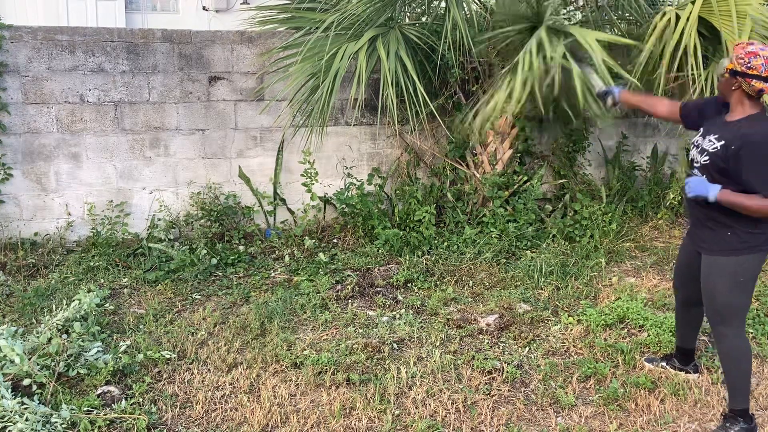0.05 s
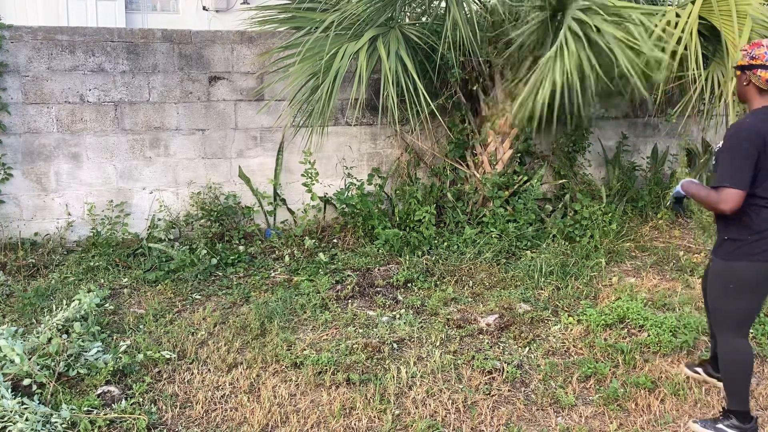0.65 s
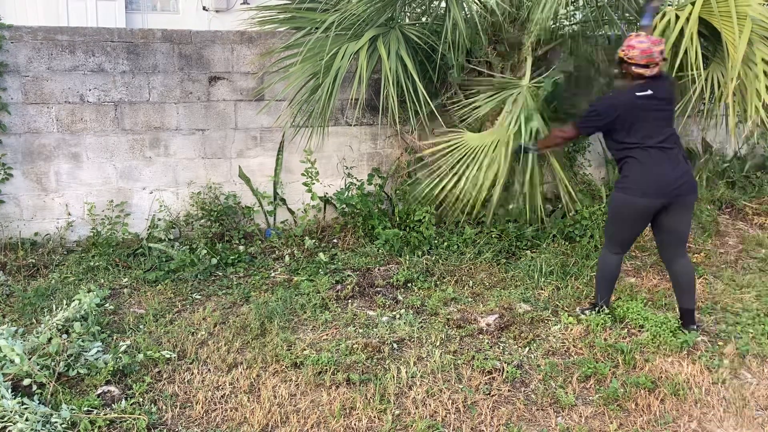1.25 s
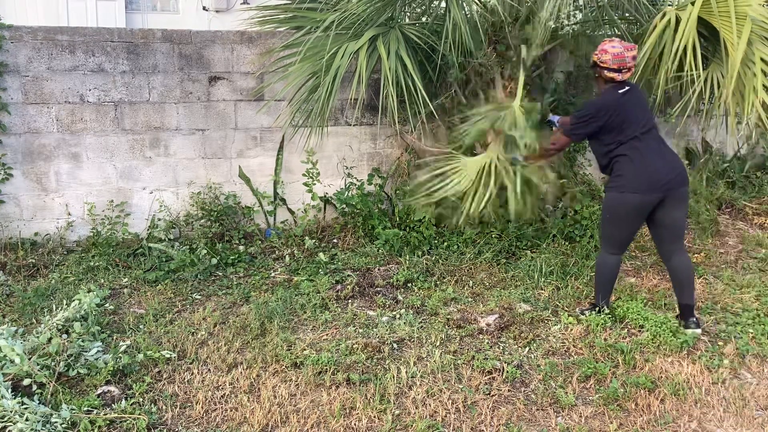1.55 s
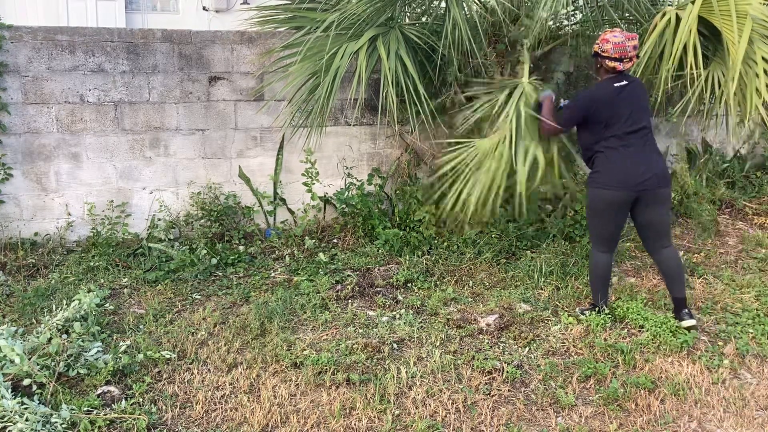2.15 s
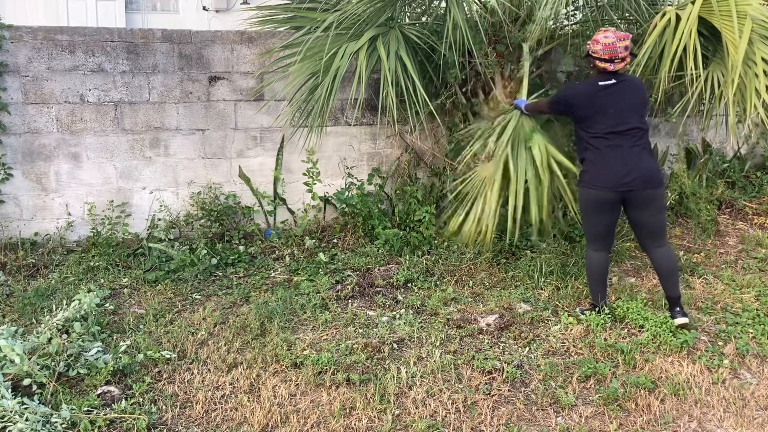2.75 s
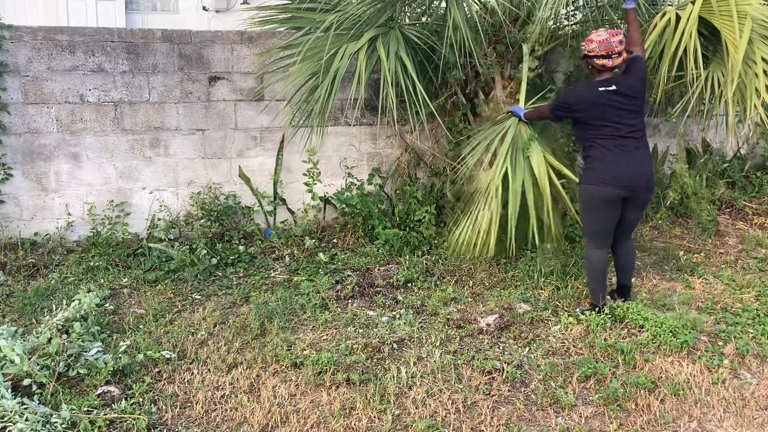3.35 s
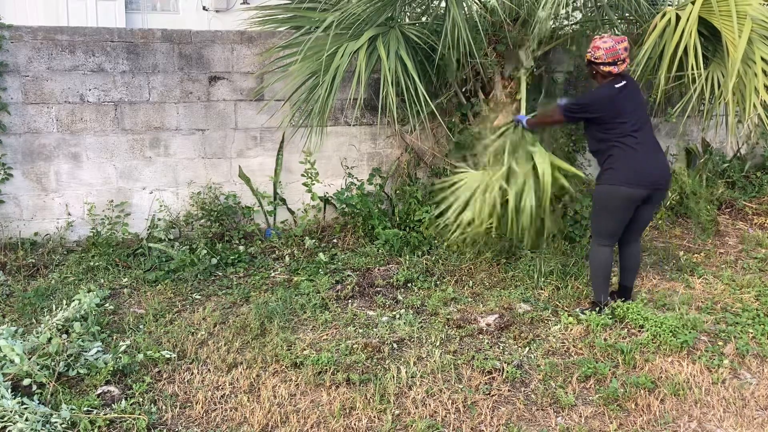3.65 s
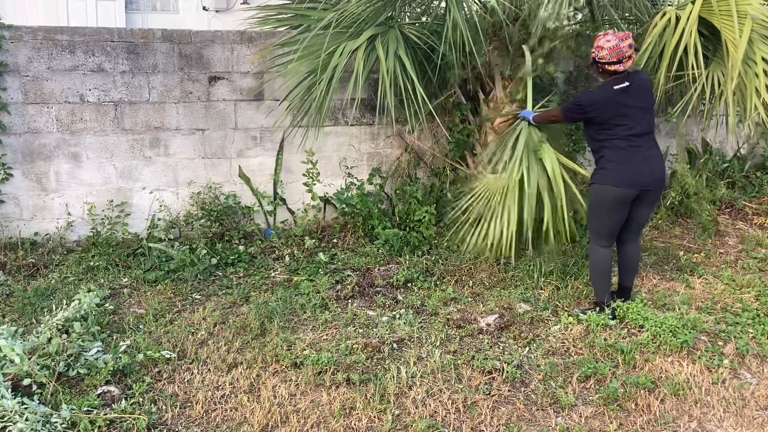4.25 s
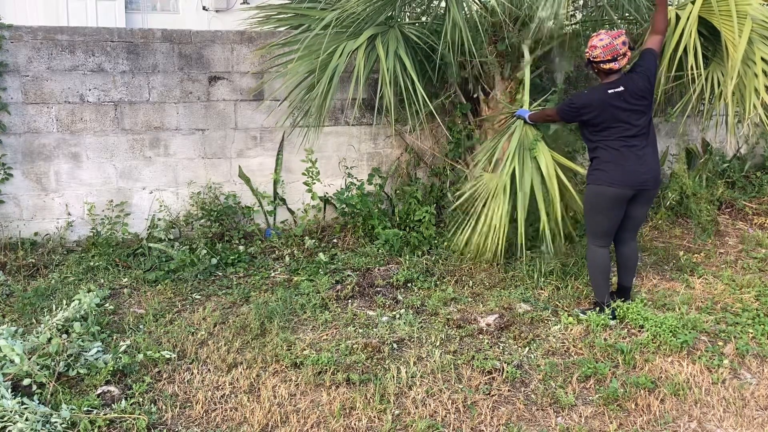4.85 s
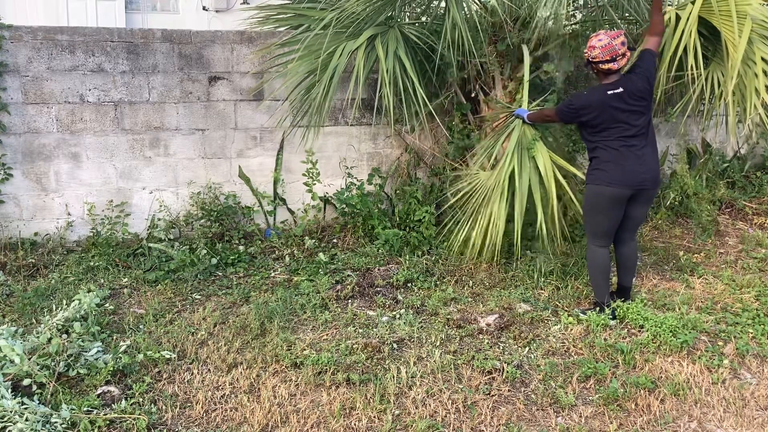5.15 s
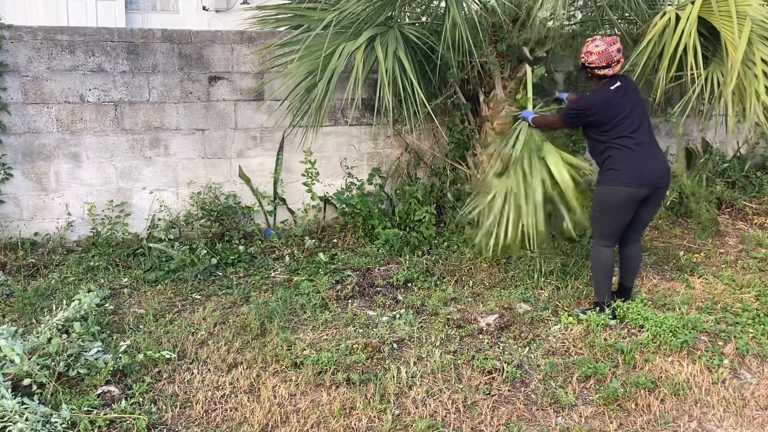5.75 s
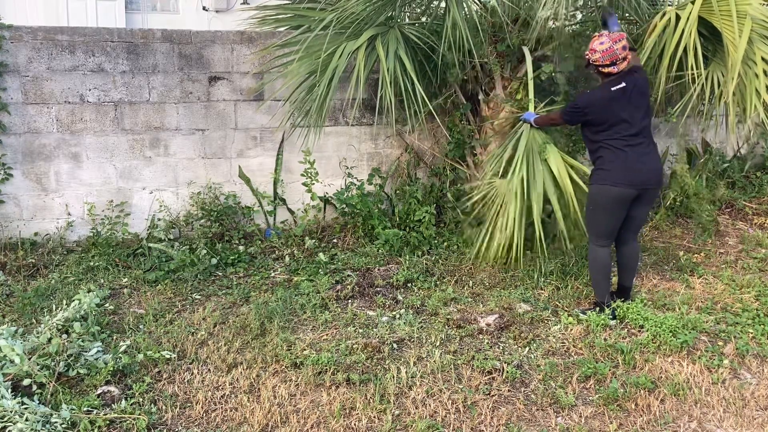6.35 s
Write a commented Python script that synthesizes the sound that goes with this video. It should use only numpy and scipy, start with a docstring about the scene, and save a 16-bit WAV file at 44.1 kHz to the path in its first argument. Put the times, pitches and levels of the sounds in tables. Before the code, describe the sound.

A machete chops three times into palm stalks outdoors, with rustling leaves over a steady low rumble.

```python
"""Palm leaves rustle in a walled yard over a humming machine and distant traffic.
A machete chops three times into the stalks of the fan palm: each blow brushes the leaves, cracks fibres
and sends a bending wave down the stalk, and the stiff fan shakes and settles.
Soft low bumps come before the last blow, and an engine pulls away near the end."""
import sys
import numpy as np
from scipy import signal
from scipy.fft import rfft, irfft
from scipy.io import wavfile

SR = 44100
rng = np.random.default_rng(int(sys.argv[2]) if len(sys.argv) > 2 else 0)


def generate_wav(sig):
    """Save sig (samples, or channels by samples) to the path in sys.argv[1] as 16-bit PCM at SR."""
    pcm = np.round(np.clip(np.atleast_2d(sig).T, -1, 1) * 32767).astype(np.int16)
    wavfile.write(sys.argv[1], SR, pcm)


N = 291060
TIME, FREQS = np.arange(N) / SR, np.fft.rfftfreq(N, 1 / SR)

# bright leaf tips, and the dull flapping fan: (frequency [Hz], level [dB])
TIP_COLOUR = [(300, -13.5), (2300, 3), (3600, -3), (5300, -2), (6400, -4.5), (7600, 3), (9300, -0.5),
              (11500, 1), (13500, -3.5), (15500, -3.5), (16500, -20)]
FAN_COLOUR = [(120, -10), (380, 7), (600, 6.5), (1100, 2), (2300, -0.5), (3600, -6), (6000, -11.5),
              (16000, -47)]
# blade and leaves sweep past each other:
# (time [s], level [dB], rise [s], hold [s], decay [s], flapping against tips [dB])
LEAF_SWISHES = [(0.0, -40.5, 0.0011, 0.014, 0.054, 3.5), (1.429, -32, 0.0057, .005, 0.093, -18),
                (3.465, -38, 0.0012, 0.013, 0.02, -14), (3.493, -41, 0.0022, 0.015, 0.045, -9),
                (3.55, -42, 0.0062, .008, 0.054, -4.5), (3.596, -29, 0.023, 0.025, 0.12, -16),
                (5.475, -32, 0.0047, 0.022, 0.011, -10)]
# the fan swings against its neighbours:
# (peak time [s], level [dB], half length [s], flapping against tips [dB])
FAN_SWINGS = [(0.115, -55, 0.12, 4.5), (0.312, -53, 0.025, -3), (0.564, -57, 0.15, -11),
              (1.366, -58, 0.12, -10), (1.69, -48.5, .02, -13), (1.867, -59, .015, -2),
              (2.117, -55.5, 0.098, 4.5), (2.497, -57, 0.089, 3), (2.697, -57.5, 0.16, 1),
              (3.25, -61.5, 0.16, -8), (3.868, -57, 0.016, -10), (4.07, -53, 0.026, -18),
              (4.256, -52, 0.074, -24), (4.715, -58, 0.061, -13), (5.833, -51, 0.077, 3.5),
              (6.193, -61, 0.035, -3)]
# distant traffic: (frequency [Hz], level [dB])
TRAFFIC_COLOUR = [(15, -17), (28, -16), (42, 0.5), (65, 4.5), (95, 4), (130, -5), (180, -10.5),
                  (300, -21.5), (700, -60)]
# a vehicle pulls away: (peak time [s], boost [dB])
TRAFFIC_SURGES = [(4.66, 6.8), (5.02, 3.7)]
# engine notes: (time [s], length [s], starting firing rate [Hz], glide [Hz/s], relative level [dB])
ENGINE_GLIDES = [(0, 1.02, 79.9, -4.5, -40), (1.146, 1.03, 50.94, 1, -39.5),
                 (4.593, 0.75, 72.16, 61, -38.5), (5.844, 0.79, 111.3, 35, -42.5)]
# machine hum: (frequency [Hz], level [dB])
HUM_TONES = [(38.5, -53.5), (76, -43), (121, -52)]
# open air: (frequency [Hz], level [dB])
AIR_COLOUR = [(110, -15), (180, -4.5), (300, -5.5), (490, -11), (680, -7.5), (1100, -13.5), (2000, -17.5),
              (3400, -28), (5300, -25), (7700, -34), (11000, -33.5), (16000, -54)]
# single leaves snap: (time [s], level [dB], pitch [Hz], quarter of the peak's width [octaves])
LEAF_SNAPS = [(0.0788, -9, 12500, .7), (1.3268, -27, 7800, .3), (1.4022, -28, 11000, .4),
              (1.4346, -1.5, 10500, .65), (1.8660, -28, 7600, .35), (3.4684, -14, 7200, .3),
              (3.5025, -18, 7100, .2), (3.6070, -13.5, 7600, .3), (3.6757, 1, 11500, .65),
              (4.0330, -18.5, 11500, .55), (5.4422, -14, 7700, .24)]
# the edge zips over leaf ribs: (time [s], length [s], level [dB], pitch [Hz])
RIB_SKIDS = [(1.438, .009, -30, 9500), (3.471, 0.01, -39, 9300), (3.552, 0.023, -46, 7800),
             (3.62, .022, -41, 10200), (4.25, 0.024, -49, 8300), (5.477, 0.016, -33, 11400)]
# machete blows: (time [s], wave trim [dB], wave tilt [dB/octave], travel at 1 kHz [s], thock [Hz],
# thock boost [dB], knock [Hz], crack trim [dB], crack pitch [ratio], splinter trim [dB],
# tearing energy decay [s], first click against tearing [ratio], side wall send [dB],
# fan shake [dB], shake rise [s])
BLOWS = [(1.4491, -0.5, -1.5, .0068, 510, 6.5, 1700, -3, 1.22, 3.5, 0.0054, 0.83, -3.5, -29.5, 0.048),
         (3.6342, -1.5, -0.8, .0065, 453, 4, 1490, 3, 1.59, 4, 0.0042, 0.74, -6.5, -34.5, 0.03),
         (5.5106, -0.5, 0.5, .0105, 580, 6.5, 2190, -1, 1.17, -1, 0.003, 0.93, -0.5, -32, 0.084)]
# the bending wave, the woody crack and the fine splinters: (frequency [Hz], level [dB])
BEND_COLOUR = [(60, -47), (140, -0.5), (185, 2), (250, -2.5), (350, -2), (540, -0.5), (720, -3.5), (930, 1),
               (1300, -7.5), (2000, -7), (3400, -16), (4500, -17), (16000, -58)]
WOOD_COLOUR = [(150, -26), (600, -7), (1200, 10), (1900, 9), (3400, 4), (4600, -10), (8000, -29),
               (16000, -28)]
SPLINTER_COLOUR = [(1000, -46), (5000, -6), (6500, 0), (8500, 6), (11500, -2), (16000, -7.5)]
# stalk modes, driven by where each cut lands:
# (frequency [Hz], t60 [s], first cut [dB], second cut [dB], third cut [dB])
STALK_MODES = [(182.6, 0.078, -1.5, 4, 4.5), (289, 0.11, -2, -2.5, -9), (455, 0.042, -6, -1, -15),
               (548, 0.049, 0.5, -9, -6), (598, 0.097, -18, -8, -1.5), (888, 0.062, 2, 0.5, 0.5),
               (950, 0.04, -10, -10, 2.5), (1085, 0.036, -5, -2, 1), (1210, 0.051, 4, -14, 1),
               (1380, 0.065, -13, -4, -24), (1625, 0.044, 1.5, 2, -23), (1814, 0.029, -2, -13, 4.5),
               (2280, 0.044, -11, -14, -3), (2560, .03, -1, -3, -11), (3400, 0.025, -13, -8, 4)]
# the stalk gives way: (time [s], level [dB], pitch [Hz], decay [cycles], fibre trim [dB],
# splinter trim [dB])
STALK_CRACKS = [(1.4772, 5, 2050, 1.9, -4, 4), (3.4952, -20, 1900, 1.5, 5, 7),
                (3.5015, -21, 1600, 1.5, 8, 8), (3.6752, -9, 3600, 1.2, 0, 9)]
# soft low bumps: (time [s], level [dB], pitch [Hz])
SOFT_BUMPS = [(4.101, -30, 110), (4.496, -31, 130), (4.581, -23, 120), (4.826, -32, 160),
              (4.978, -22.5, 100), (5.036, -25, 95), (5.078, -27, 90), (5.115, -30.5, 160)]
# ground and back wall: (left delay [s], right delay [s], level [dB])
EARLY_ECHOES = [(.0031, .0031, -18.5), (0.0131, 0.013, -17.5), (0.0177, .0188, -19), (0.05, 0.0491, -31)]
# the yard's tail: (frequency [Hz], t60 [s])
YARD_DECAY = [(150, 0.82), (600, 1), (2000, 0.82), (5000, 0.54), (15000, 0.79)]
# sound scattered by plants and walls: (frequency [Hz], level [dB])
SCATTER_COLOUR = [(100, -8), (175, 8.5), (260, -4), (480, -6), (700, -1), (1100, 0.5), (3000, -2),
                  (4800, 1), (15000, 0)]
# diffuse sound at the two microphone ports: (frequency [Hz], left-right likeness [0-1])
PORT_LIKENESS = [(60, .86), (150, .88), (350, .62), (700, .35), (1400, .35), (3000, .5), (5000, .5),
                 (8000, .85), (15000, .85)]
# phase between the ports: (frequency [Hz], left lead [rad])
PORT_PHASE = [(0, 0), (3360, -0.1), (5510, -2.3), (5940, -3.4), (6290, 0.2), (7490, -0.4), (8440, -2.9),
              (9560, -3.2), (10500, -5.8), (12300, -6.8), (13000, -9.3), (14400, -9.6), (15200, -12.4),
              (16500, -12.9)]


def gain_of(db):
    """Decibels to amplitude."""
    return 10 ** (np.asarray(db) / 20)


def unit_rms(x):
    """Scales to rms 1."""
    return x / np.sqrt(np.mean(x ** 2) + 1e-20)


def read(points, hz):
    """Reads a curve on a log-frequency axis."""
    f, value = np.transpose(points)
    return np.interp(np.log(hz + 1), np.log(f + 1), value)


def add(mix, s, sound):
    """Drops a sound into the mix at time s."""
    part = mix[max(round(s * SR), 0):][:len(sound)]
    part += sound[:len(part)]


def bell(hz, centre_hz, octaves):
    """An EQ bell of height 1."""
    return np.exp(-(np.log2((hz + 1) / centre_hz) / octaves) ** 2)


def swell(s, half_s):
    """A smooth rise and fall of height 1 around time s."""
    return np.exp(-((TIME - s) / half_s) ** 2 / 2)


def envelope(s, rise, decay, hold=0):
    """Attack, hold and release of height 1, starting at time s."""
    age = TIME - s
    return np.clip(age / rise, 0, 1) * np.exp(-np.maximum(age - rise - hold, 0) / decay)


def colour(x, points, size=4096):
    """Minimum-phase EQ of unit energy with the given spectrum."""
    log_gain = np.log(gain_of(read(points, abs(np.fft.fftfreq(size, 1 / SR)))))
    taps = np.fft.ifft(np.exp(np.conj(signal.hilbert(log_gain)))).real[:size // 2]
    return signal.fftconvolve(x, taps / np.linalg.norm(taps))[:len(x)]


def diffuse(a, b):
    """Two unrelated signals become a partly alike left and right."""
    likeness = np.clip(read(PORT_LIKENESS, FREQS), 0, 1)
    mid, side = rfft(a) * np.sqrt((1 + likeness) / 2), rfft(b) * np.sqrt((1 - likeness) / 2)
    return irfft(np.array([mid + side, mid - side]), N)


def noise_bed(points):
    """Steady, diffuse stereo noise with the given spectrum."""
    spectra = rfft(rng.standard_normal((2, N))) * gain_of(read(points, FREQS))
    return diffuse(*(unit_rms(side) for side in irfft(spectra, N)))


def drift(hz):
    """A random wobble of rms 1, mostly slower than hz."""
    return unit_rms(irfft(rfft(rng.standard_normal(N)) / (1 + (FREQS / hz) ** 4), N))


def leaf_taps(per_s, grain_db, ring_s, top_hz):
    """Leaves touch at random with uneven force, each tap ringing briefly at its own pitch."""
    when, pitch, chance, phase = rng.random((round(per_s * N / SR), 4)).T[:, :, None]
    age = np.arange(SR // 300)
    force = gain_of(grain_db * np.minimum(-np.log(1 - chance), 4))
    taps = force * np.exp(-age / SR / ring_s) * np.cos(2 * np.pi * (top_hz * pitch * age / SR + phase))
    positions = (when * N).astype(int) + age
    return unit_rms(np.bincount(positions.ravel(), taps.ravel(), N)[:N])


def crackle(points, **taps):
    """Small ringing taps over smooth rubbing, in stereo at rms 1."""
    grains = [leaf_taps(**taps) + rub for rub in rng.standard_normal((2, N))]
    return unit_rms(diffuse(*(colour(side, points) for side in grains)))


def leaf_rustle(breeze_db=-68, settle_db=-48, blow_flap_db=-31, flap_rise_s=0.016):
    """Tips tap and the fan flaps in clumps, as hard as the frond moves; its motions add in power."""
    motions = [(gain_of(breeze_db) * np.ones(N), 0)]  # (tip amplitude, flapping against tips [dB])
    motions += [(gain_of(db) * swell(s, half), flap_db) for s, db, half, flap_db in FAN_SWINGS]
    motions += [(gain_of(db) * envelope(s, rise, decay, hold), flap_db)
                for s, db, rise, hold, decay, flap_db in LEAF_SWISHES]
    motions += [(gain_of(settle_db) * envelope(s, flap_rise_s, decay=0.35), 3.5) for s, *_ in BLOWS]
    tip_power = sum(level ** 2 for level, _ in motions)
    flap_power = sum((level * gain_of(flap_db)) ** 2 for level, flap_db in motions)
    for s, *_, shake_db, rise in BLOWS:
        tip_power += (gain_of(shake_db) * envelope(s, rise, decay=0.063)) ** 2
        flap_power += (gain_of(blow_flap_db) * envelope(s, flap_rise_s, decay=0.088)) ** 2
    tips = crackle(TIP_COLOUR, per_s=2400, grain_db=2.0, ring_s=0.00024, top_hz=16560)
    flaps = crackle(FAN_COLOUR, per_s=1000, grain_db=0.9, ring_s=0.00088, top_hz=6960)
    clumps = gain_of(0.9 * drift(hz=46))
    return (tips * np.sqrt(tip_power) + flaps * np.sqrt(flap_power)) * clumps


def traffic(surge_db, level_db=-38.5):
    """Distant traffic: a slightly lumpy rumble that rides the surges."""
    return noise_bed(TRAFFIC_COLOUR) * gain_of(level_db + surge_db + 0.5 * drift(hz=6.7))


def engines(surge_db, trim_db=-1.5, overtone_db=-27, waver_db=3, rise_s=0.025):
    """Each engine note comes up, holds while its firing rate glides, and fades."""
    out = np.zeros(N)
    for s, length, start_hz, glide, db in ENGINE_GLIDES:
        hz = start_hz + glide * np.clip(TIME - s, 0, length)
        angle = 2 * np.pi * np.cumsum(hz * (1 + 0.022 * drift(hz=7.25))) / SR
        level = gain_of(trim_db + db + surge_db + waver_db * drift(hz=15))
        level *= envelope(s, rise_s, decay=0.49, hold=length - rise_s)
        out += level * (np.sin(angle) + gain_of(overtone_db) * np.sin(2 * angle))
    return np.sqrt(2) * out


def machine_hum(waver_db=3):
    """A machine drones on low tones that waver in level and phase."""
    out = np.zeros(N)
    for hz, db in HUM_TONES:
        level = gain_of(db + waver_db * drift(hz=0.75))
        out += level * np.sin(2 * np.pi * hz * TIME + 0.14 * drift(hz=8.1))
    return np.sqrt(2) * out


def open_air(level_db=-48, swell_db=0.35):
    """A soft outdoor hiss that slowly breathes."""
    return noise_bed(AIR_COLOUR) * gain_of(level_db - swell_db * drift(hz=0.39))


def tear(decay, bite, fibres_per_s=14000):
    """One sharp click, then a dying burst of parting fibres; bite sizes the click against the burst."""
    t = TIME[:SR // 8]
    burst = rng.standard_normal(len(t)) * (rng.random(len(t)) < fibres_per_s / SR)
    burst *= np.exp(-t / decay / 2)
    clicks = burst / np.linalg.norm(burst)
    clicks[0] = -bite
    return clicks / np.linalg.norm(clicks)


def leaf_snaps(skirt_db=-23.5):
    """A stiff leaf blade flicks: one short, dry tick at the pitch of that blade."""
    out, hz = np.zeros(N), np.fft.rfftfreq(256, 1 / SR)
    for s, db, centre_hz, octaves in LEAF_SNAPS:
        flick = tear(decay=0.0008, bite=3.5)
        eq_db = skirt_db * (1 - bell(hz, centre_hz, 2 * octaves))
        add(out, s, gain_of(db) * colour(flick, np.transpose([hz, eq_db])))
    return out


def yard_tail(x, tail_db=-13, onset_s=0.0027):
    """A thin reverb tail scattered by plants and houses."""
    hz, t, spectra = signal.stft(rng.standard_normal((2, SR)), SR, nperseg=256)
    fade = gain_of(-60 * t / read(YARD_DECAY, hz)[:, None]) * np.minimum(t / onset_s, 1)
    tail = signal.istft(spectra * fade, SR, nperseg=256)[1]
    wet = signal.fftconvolve(colour(x, SCATTER_COLOUR)[None], tail / np.linalg.norm(tail[0]), axes=1)
    return gain_of(tail_db) * diffuse(*wet[:, :N])


def edge_skids(octaves=0.15):
    """The edge rubs over leaf ribs: a brief zip of narrow, high hiss."""
    out, t = np.zeros(N), TIME[:SR // 10]
    for s, length, db, hz in RIB_SKIDS:
        band = bell(np.fft.rfftfreq(len(t), 1 / SR), hz, octaves)
        rub = unit_rms(irfft(rfft(rng.standard_normal(len(t))) * band))
        arch = np.sqrt(abs(np.sin(np.pi * np.minimum(t / length, 1))))
        add(out, s, gain_of(db) * rub * arch)
    return out


def blade_push(decay, shove=1.5, rough_above_hz=330):
    """The force of a blow: one shove, roughened by parting fibres."""
    low_cut = signal.butter(2, rough_above_hz, "high", fs=SR, output="sos")
    force = signal.sosfilt(low_cut, tear(decay, bite=0))
    force[0] -= shove
    return force


def bending_wave(travel, tilt_db, thock_hz, thock_db, knock_hz, knock_db=7.5, size=8192):
    """Bending speed grows with the root of frequency: treble lands first, so the blow chirps down."""
    hz = np.fft.rfftfreq(size, 1 / SR)
    slowness = np.sqrt(1000 / np.clip(hz, 400, 4200))  # relative to 1 kHz
    delay = travel * (slowness - slowness.min())
    chirp = irfft(np.exp(-2j * np.pi * np.cumsum(delay) * SR / size))[:size // 2]
    eq_db = read(BEND_COLOUR, hz) + tilt_db * np.log2(hz + 1)
    # the place of the cut favours one low and one high band
    eq_db += thock_db * bell(hz, thock_hz, 0.27) + knock_db * bell(hz, knock_hz, 0.22)
    wave = colour(chirp, np.transpose([hz, eq_db]))
    return wave / np.linalg.norm(wave)


def stalk_ring(wave, cut, direct=0.52):
    """The wave runs to and fro in the stalk and feeds its modes; a share radiates at once."""
    t = TIME[:SR // 4]
    response = np.zeros(len(t))
    for hz, t60, *drive_db in STALK_MODES:
        unity_peak = 2 * np.log(1000) / (t60 * SR)
        response += unity_peak * gain_of(drive_db[cut] - 60 * t / t60) * np.cos(2 * np.pi * hz * t)
    response[0] += direct
    return signal.fftconvolve(wave, response)


def chops(knock_db=15, crack_db=8, splinter_db=5, fine_bite=0.68):
    """Each blow layers a ringing knock, a woody crack and splinters; returns the mix and a wall send."""
    out, to_wall = np.zeros((2, N))
    for cut, (s, wave_db, tilt_db, travel, thock_hz, thock_db, knock_hz,
              wood_db, wood_pitch, fine_db, decay, bite, wall_db, *_) in enumerate(BLOWS):
        chirp = bending_wave(travel, tilt_db, thock_hz, thock_db, knock_hz)
        wave = signal.fftconvolve(chirp, blade_push(decay))
        knock = gain_of(knock_db + wave_db) * stalk_ring(-wave / np.linalg.norm(wave), cut)
        crack = colour(tear(decay, bite), np.array(WOOD_COLOUR) * [wood_pitch, 1])
        splinters = colour(tear(decay, fine_bite * bite), SPLINTER_COLOUR)
        add(out, s, knock)
        add(out, s, gain_of(crack_db + wood_db) * crack + gain_of(splinter_db + fine_db) * splinters)
        add(to_wall, s, gain_of(wall_db) * knock)
    return out, to_wall


def early_echoes(x):
    """Quick bounces off the ground and the back wall."""
    out = np.zeros((2, N))
    for left_s, right_s, db in EARLY_ECHOES:
        add(out[0], left_s, gain_of(db) * x)
        add(out[1], right_s, gain_of(db) * x)
    return out


def stalk_cracks(splinter_db=-19, fibre_db=-4):
    """The stalk gives way with a woody pop of a few cycles, torn fibres and some splinters."""
    out, t = np.zeros(N), TIME[:SR // 8]
    for s, db, hz, cycles, torn_db, fine_db in STALK_CRACKS:
        pop = np.sin(2 * np.pi * hz * t) * np.sqrt(t) * np.exp(-t * hz / cycles)
        rip = tear(decay=0.0018, bite=0.69)
        splinters = gain_of(splinter_db + fine_db) * colour(rip, SPLINTER_COLOUR)
        fibres = gain_of(fibre_db + torn_db) * colour(rip, FAN_COLOUR)
        add(out, s, gain_of(db) * (pop / np.linalg.norm(pop) + splinters + fibres))
    return out


def wall_slap(x, delay_s=0.0445, left_lag_s=0.0004, level_db=-5.5, band_hz=(750, 1400)):
    """A side wall throws back the mids of each knock: one hollow slap, right side first."""
    slap = gain_of(level_db) * signal.sosfilt(signal.butter(2, band_hz, "band", fs=SR, output="sos"), x)
    out = np.zeros((2, N))
    add(out[0], delay_s + left_lag_s, slap)
    add(out[1], delay_s, slap)
    return out


def low_bumps(tap_db=-10):
    """Dull bumps: one heavily damped low swing with a small, higher tap."""
    out, t = np.zeros(N), TIME[:SR // 10]
    for s, db, hz in SOFT_BUMPS:
        thud = np.sin(2 * np.pi * hz * t) * t / 0.0042 * np.exp(1 - t / 0.0052)
        tap_hz = 290 * rng.uniform(0.73, 1.1)
        tap = np.sin(2 * np.pi * tap_hz * t) * np.exp(-t / 0.0094)
        add(out, s, gain_of(db) * (thud + gain_of(tap_db) * tap))
    return out


def lean_right(x, db):
    """Pans by taking db off the left and adding it to the right."""
    return x * gain_of([[-db], [db]])


def scene():
    """Blows with their echoes, ticks with only the yard's tail, then leaves, bumps and the ambience."""
    cuts, to_wall = chops()
    blows = cuts + stalk_cracks()
    ticks = leaf_snaps() + edge_skids()
    near = blows + ticks + early_echoes(blows) + wall_slap(to_wall) + yard_tail(blows + ticks)
    foreground = lean_right(near, db=0.2) + leaf_rustle() + low_bumps()
    surge_db = sum(db * swell(s, half_s=0.11) for s, db in TRAFFIC_SURGES)
    low_bed = traffic(surge_db) + engines(surge_db) + machine_hum()
    return foreground + lean_right(low_bed, db=0.9) + lean_right(open_air(), db=0.5)


def record(dry):
    """The microphone ports turn the treble's phase apart; peaks soft-clip; the top ends at 16 kHz."""
    lead = np.interp(FREQS, *np.transpose(PORT_PHASE))
    ports = irfft(rfft(dry) * np.exp(0.5j * np.array([lead, -lead])), N)
    rounded = ports / (1 + ports ** 8) ** (1 / 8)
    high_cut = signal.firwin(255, 16000, window=("kaiser", 9), fs=SR)
    return signal.oaconvolve(rounded, high_cut[None], "same")


dry = scene()
out = record(dry)
generate_wav(out)
```